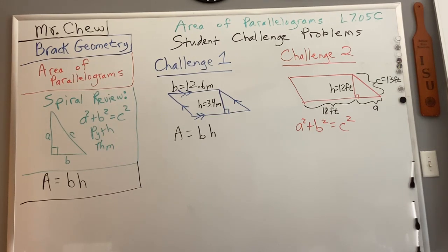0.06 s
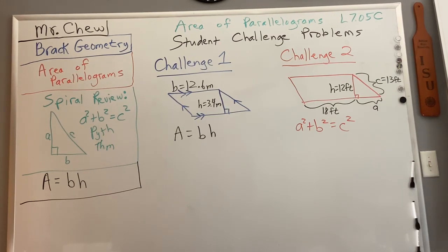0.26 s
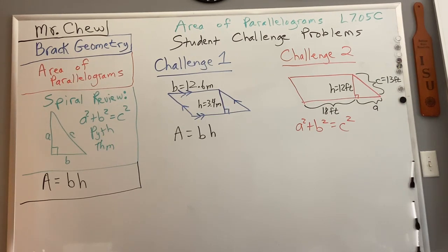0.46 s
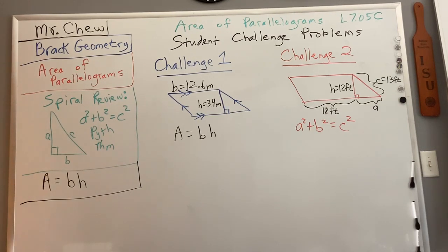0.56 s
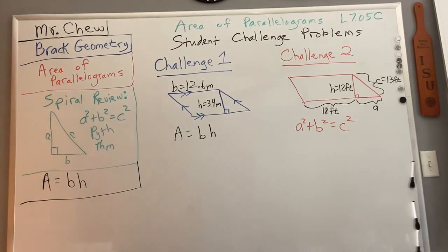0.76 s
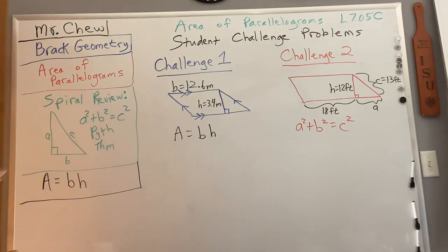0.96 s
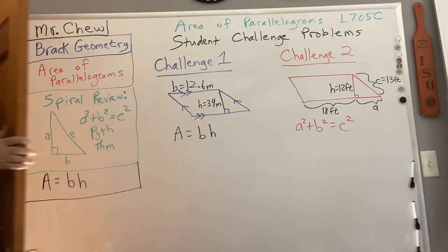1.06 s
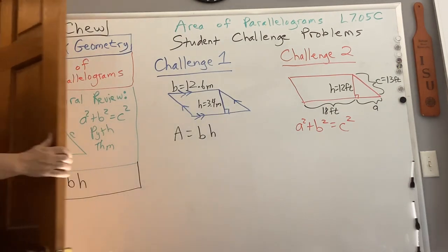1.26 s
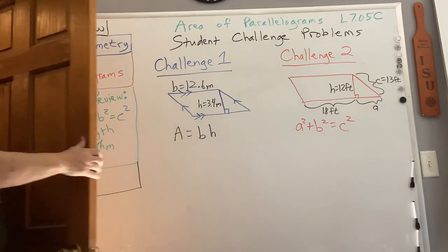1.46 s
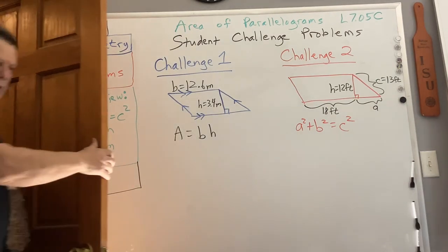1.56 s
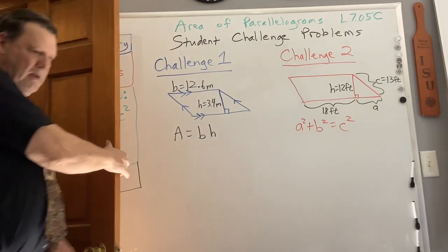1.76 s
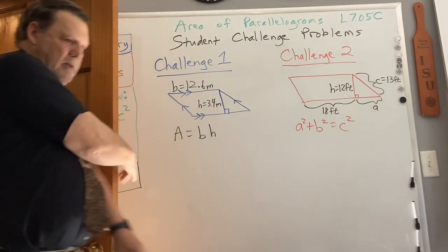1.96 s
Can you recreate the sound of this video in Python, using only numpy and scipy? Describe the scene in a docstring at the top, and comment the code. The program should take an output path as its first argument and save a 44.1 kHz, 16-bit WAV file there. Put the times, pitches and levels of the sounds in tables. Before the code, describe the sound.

A wooden door opens with a clattering latch, a creak and a squeaking hinge.

```python
"""A wooden door opens

A few metres away in a small, quiet room, the knob grinds and the latch clatters. The door's edge scrapes
and creaks out of its frame in stick-slip, the leaf thuds, and a hinge sings one rising note as it swings.
Soft footfalls and a rustle of clothes follow."""
import sys
import numpy as np
from scipy import signal
from scipy.fft import rfft, irfft
from scipy.io import wavfile
from scipy.ndimage import uniform_filter1d

SR = 44100
rng = np.random.default_rng(int(sys.argv[2]) if len(sys.argv) > 2 else 0)


def master(y):
    """Save y as 16-bit WAV."""
    cut = np.clip(np.atleast_2d(y).T, -1, 1)
    pcm = np.round(cut * 32767)  # scale
    wavfile.write(sys.argv[1], SR, pcm.astype(np.int16))


N = 88200
T = np.arange(N) / SR


def undb(db):
    """Decibels to gain."""
    return 10 ** (np.asarray(db) / 20)


def unit_rms(x):
    """Scale to rms 1."""
    return x / np.sqrt(np.mean(x ** 2))


def unit_energy(x):
    """Scale to energy 1."""
    return x / np.sqrt(np.sum(x ** 2))


def fade(rows):
    """Gain envelope from rows that start with seconds and end with dB; silent before and after."""
    rows = np.array(rows)
    return undb(np.interp(T, rows[:, 0], rows[:, -1])) * (T >= rows[0, 0]) * (T <= rows[-1, 0])


def arch(at, length):
    """Half a sine: swells and ends."""
    return np.sin(np.pi * np.clip((T - at) / length, 0, 1))


def decay(t60):
    """Exponential fall of 60 dB in t60 seconds."""
    return np.exp(-np.log(1000) * T / t60)


def conv(x, response):
    """Play a signal through a response."""
    return signal.fftconvolve(x, response)[:N]


def colour(x, points):
    """Minimum-phase EQ of energy 1, shaped by (Hz, dB) points; falls 18 dB an octave beyond both ends."""
    hz, db = np.array(points).T
    octave = np.log2(np.maximum(np.arange(2049) * SR / 4096, 1))
    outside = np.maximum(np.log2(hz[0]) - octave, 0) + np.maximum(octave - np.log2(hz[-1]), 0)
    curve_db = np.interp(octave, np.log2(hz), db) - 18 * outside
    cepstrum = irfft(np.log(undb(curve_db)))
    causal = np.r_[cepstrum[0], 2 * cepstrum[1:2048]]
    response = irfft(np.exp(rfft(causal, 4096)))
    return conv(x, unit_energy(response))


def ring(modes):
    """Response of damped modes of alternating polarity."""
    return unit_energy(sum((-1) ** k * undb(db) * decay(t60) * np.sin(2 * np.pi * hz * T)
                           for k, (hz, db, t60) in enumerate(modes)))


def wobble(rate_hz):
    """Smooth random drift with a spread near 1."""
    hold = int(SR / rate_hz)
    stepped = rng.standard_normal(N)[np.arange(N) // hold]
    return 1.2 * uniform_filter1d(stepped, hold)


def grains(per_s, spread_db):
    """Friction: dense tiny slips of uneven size, at rms 1."""
    slips = (rng.random(N) < per_s / SR) * rng.choice([-1, 1], N)
    sizes = undb(spread_db * np.minimum(rng.exponential(size=N), 4))
    return unit_rms(slips * sizes)


def burst(at, t60, attack_s=0.0025):
    """A short chatter of contacts, with the energy of 10 ms at rms 1."""
    chatter = grains(9000, spread_db=2.27) * decay(t60) * (1 - np.exp(-T / attack_s))
    return np.r_[np.zeros(int(at * SR)), unit_energy(chatter)][:N] * np.sqrt(SR / 100)


def stick_slip(glide, parts_db, jitter, edge=1, flutter_db=.9):
    """A squeal along (s, Hz) points: trembling pitch, fluttering harmonics; edge scales the overtones."""
    at, hz = np.array(glide).T[:2]
    pitch = np.interp(T, at, hz) * (1 + jitter * wobble(400))
    phase = 2 * np.pi * np.cumsum(pitch) / SR
    tone = np.zeros(N)
    for k, db in enumerate(parts_db):
        gain = undb(db + flutter_db * (k + 1.5) * wobble(59.85))
        tone += (edge if k else 1) * gain * np.sin((k + 1) * phase)
    return tone


def room(x, wet_db):
    """Direct sound plus wall reflections that thicken into a tail; the treble dies first."""
    predelay_s, build_s, split_hz = .004, .06, 6200
    density = np.minimum(.02 + (T / build_s) ** 2, 1)
    echoes = rng.standard_normal(N) * (rng.random(N) < density) / np.sqrt(density)
    low, high = (signal.sosfilt(signal.butter(3, split_hz, side, fs=SR, output="sos"), echoes)
                 for side in ("low", "high"))
    tail = unit_energy((low * decay(t60=.34) + high * decay(t60=.25)) * (T > predelay_s))
    return (x + undb(wet_db) * conv(x, tail)) / np.hypot(1, undb(wet_db))


def room_tone(level_db=-70.5):
    """The room's faint hum: a steady bed of bass-heavy noise."""
    # Tone of the bed. Each row: frequency in Hz, relative level in dB.
    bed_eq = [(30, -16.5), (80, 1), (125, -4.5), (175, -21), (600, -24.5), (1000, -28.5), (3900, -35.5),
              (15000, -43)]
    return undb(level_db) * unit_rms(colour(rng.standard_normal(N), bed_eq))


def doorway_foley():
    """Dull knocks of the door, then soft footfalls, with shuffling and brushing cloth."""
    # Dull knocks of the door (first two rows), then soft footfalls. Each row: start in seconds, level in dB.
    impact_cues = [(0.805, -43.5), (0.843, -50.5), (1.53, -52), (1.558, -57), (1.877, -61)]
    # Swishes of clothing. Each row: peak time, rise and fall in seconds, level in dB.
    rustles = [(1.002, 0.022, 0.013, -76), (1.067, 0.0043, 0.039, -65), (1.204, 0.043, 0.038, -65.5),
               (1.29, 0.024, 0.018, -73.5), (1.609, 0.043, 0.088, -65.5), (1.985, 0.038, 0.03, -60)]
    # Envelope of the shuffling. Each row: time in seconds, level in dB.
    shuffle_levels = [(0.25, -87.5), (0.5, -66.5), (0.9, -64), (1.1, -66), (1.45, -67), (1.62, -61),
                      (1.8, -64.5), (2.0, -63)]
    # Tone of impacts, cloth and shuffling. Each row: frequency in Hz, relative level in dB.
    impact_eq = [(70, -29), (120, -7), (350, -1), (550, -2), (1000, -8), (1700, -11), (4000, -35)]
    cloth_eq = [(200, -15), (700, -3), (2000, -10), (4000, -2.5), (7000, -9), (11000, -3.5), (15000, -18)]
    shuffle_eq = [(35, -3.5), (60, -9.5), (114, -4), (153, -10), (390, -9), (549, -11), (1400, -16.5),
                  (6450, -31), (10900, -36), (14000, -55)]
    impacts = colour(sum(undb(db) * burst(at, t60=0.12) for at, db in impact_cues), impact_eq)
    swish = sum(undb(db) * np.exp(-np.maximum((at - T) / rise, (T - at) / fall))
                for at, rise, fall, db in rustles)
    movement = undb(np.interp(T, *np.array(shuffle_levels).T))
    shuffle = colour(movement * grains(6000, spread_db=2), shuffle_eq)
    cloth = colour(swish * grains(7000, spread_db=1.3), cloth_eq)
    return room(impacts + cloth + shuffle, wet_db=-15)


def door_leaf():
    """Pushes set the door leaf booming; a longer push is duller."""
    # Modes of the leaf. Each row: frequency in Hz, relative level in dB, T60 in seconds.
    modes = [(88, -1, 0.24), (123, 5, 0.28), (174, 7, 0.18), (212, 4, .12), (268, 7, 0.26), (334, 3, 0.2)]
    # Pushes on the leaf. Each row: start in seconds, strength in dB, length in seconds.
    thuds = [(0.258, -44, 0.003), (0.326, -31.5, 0.0054), (0.359, -37, 0.001), (0.46, -31, 0.0096),
             (0.58, -45, 0.0077), (0.626, -52.5, 0.0012), (0.694, -46, 0.0026), (0.804, -46, 0.002),
             (0.859, -54, 0.0041), (1.02, -38, 0.0094), (1.534, -62, 0.0025)]
    pushes = sum(undb(db) * arch(at, length) / (length * SR) for at, db, length in thuds)
    boom = ring(modes)
    return room(conv(pushes, 2 * boom / np.abs(boom).max()), wet_db=-11.5)


def scrape():
    """The door's edge rubs on the frame and the bolt grates over the strike plate."""
    # Friction envelopes of edge and bolt. Each row: time in seconds, level in dB.
    edge_levels = [(0.455, -83), (0.475, -50), (0.525, -55.5), (0.56, -43), (0.59, -41), (0.645, -49),
                   (0.685, -48.5), (0.745, -68), (0.765, -50.5), (0.81, -55.5), (0.85, -96), (0.92, -85)]
    bolt_levels = [(0.53, -100), (0.54, -63.5), (0.565, -69.5), (0.585, -55), (0.612, -64), (0.645, -43),
                   (0.668, -69), (0.70, -91), (0.74, -89), (0.757, -64), (0.80, -82.5), (0.83, -65)]
    # Tone of the woody edge and the bright bolt. Each row: frequency in Hz, relative level in dB.
    edge_eq = [(35, -62), (60, -2.5), (160, -1), (260, -3.5), (385, -7.5), (464, -5.5), (1020, -0.5),
               (2530, -7.5), (2840, -12), (4520, -19.5), (5450, -19), (6410, -24.5), (7720, -61),
               (15500, -45)]
    bolt_eq = [(3000, -31), (4100, 6), (4800, -59), (5350, -14), (6400, -4), (7600, 11), (8300, 2),
               (8950, 10.5), (10000, -2.5), (10900, 2.5), (15000, -11)]
    edge = colour(grains(2500, spread_db=4.6) * fade(edge_levels), edge_eq)
    bolt = colour(grains(7200, spread_db=0.95) * fade(bolt_levels), bolt_eq)
    return room(edge + bolt, wet_db=3.5)


def latch(ring_db=-21):
    """The knob's spindle grinds; each blow knocks the wood and clacks and rings the metal."""
    # Blows of latch and door. Each row: start in seconds, wood level in dB, metal against wood in dB.
    blows = [(0.231, -46.5, -19.5), (0.239, -43.5, -23), (0.259, -37.5, -12.5), (0.266, -38, -31),
             (0.275, -34.5, -17), (0.314, -34.5, -10.5), (0.329, -38.5, 5.5), (0.344, -41.5, 5.5),
             (0.36, -44.5, 5), (0.583, -50.5, -1), (0.620, -39.5, -14), (0.639, -39, -10),
             (0.655, -40.5, -23)]
    # Envelope of the spindle's grind. Each row: time in seconds, level in dB.
    spindle_levels = [(0.226, -59), (0.235, -41.5), (0.27, -46.5), (0.30, -44.5), (0.325, -37), (0.36, -72),
                      (0.39, -73)]
    # Tone of wood and metal. Each row: frequency in Hz, relative level in dB.
    wood_eq = [(110, -7), (200, 1.5), (400, 2.5), (700, 3.5), (1200, 2.5), (2060, -2), (3100, -11.5),
               (4800, -21), (5400, -16.5), (6100, -21), (7800, -22.5), (11000, -26.5), (15000, -39)]
    metal_eq = [(880, -18), (1500, -8.5), (2600, 4), (4400, -0.5), (5400, 1.5), (6000, -2), (6800, -10.5),
                (11300, -12), (15500, -35)]
    # Modes of the latch. Each row: frequency in Hz, relative level in dB, T60 in seconds.
    modes = [(2190, -4, .16), (2412, -1, .18), (2584, -2, .16), (3635, -7, .12), (4725, -5, .16),
             (5010, -4, .16), (5325, -3, .08), (5730, -6, .09), (6000, -4, .12)]
    knocks = sum(undb(db) * burst(at, t60=0.073) for at, db, _ in blows)
    grind = fade(spindle_levels) * grains(4700, spread_db=2.7)
    clacks = sum(undb(db + metal_db) * burst(at, t60=0.085) for at, db, metal_db in blows)
    ringing = undb(ring_db) * conv(clacks, ring(modes))
    return room(colour(knocks + grind, wood_eq) + colour(clacks, metal_eq) + ringing, wet_db=-8.5)


def creaks():
    """The tight door sticks and slips in its frame: a groan, a higher creak and short chirps."""
    # Paths of the groan and the creak. Each row: time in seconds, pitch in Hz, level in dB.
    groan_path = [(0.460, 496, -56), (0.469, 510.5, -45.5), (0.493, 560, -40), (0.52, 588, -45),
                  (0.542, 600, -42), (0.555, 560, -77)]
    creak_path = [(0.52, 1242, -48.5), (0.55, 1329, -44), (0.575, 1377, -39.5), (0.61, 1413, -39.5),
                  (0.64, 1439, -52), (0.672, 1426, -69), (0.692, 1385, -43.5), (0.72, 1338, -49),
                  (0.75, 1260, -54)]
    # Chirps of bolt and edge. Each row: start and length in seconds, pitch in Hz, level in dB.
    chirp_cues = [(0.234, 0.11, 5380, -54), (0.292, .015, 5400, -48.5), (0.532, 0.029, 1490, -43.5),
                  (0.563, 0.013, 5325, -46), (0.572, 0.027, 5340, -48.5), (0.581, 0.032, 1043, -46.5),
                  (0.616, 0.0085, 5780, -47), (0.636, 0.021, 5372, -44), (0.699, 0.019, 1330, -45.5),
                  (0.71, 0.044, 1035, -49.5), (0.741, 0.071, 5580, -59.5), (0.77, 0.05, 5300, -63.5)]
    groan = fade(groan_path) * stick_slip(groan_path, parts_db=[-7.5, -4, -9, -16, -29.5], jitter=.052)
    creak = fade(creak_path) * stick_slip(creak_path, parts_db=[-9, -5.5, -16, -27], jitter=.009)
    chirps = sum(undb(db) * arch(at, length) * stick_slip([(at, hz)], parts_db=[2.5, -20.5], jitter=.006)
                 for at, length, hz, db in chirp_cues)
    return room(groan + creak + chirps, wet_db=-8)


def hinge():
    """A nearly pure stick-slip note that beats against its own echoes as it glides."""
    # Envelope of the note. Each row: time in seconds, level in dB.
    levels = [(0.955, -65), (0.972, -44.5), (0.995, -39.5), (1.035, -35.3), (1.09, -39), (1.118, -58),
              (1.13, -38.5), (1.18, -47), (1.215, -47), (1.238, -40), (1.278, -46), (1.293, -69),
              (1.39, -64), (1.412, -50), (1.47, -42.5), (1.497, -56), (1.535, -52), (1.565, -56),
              (1.577, -75)]
    # Its glide, rising and then wavering. Each row: time in seconds, pitch in Hz.
    glide = [(0.955, 1893), (1.0, 1914), (1.045, 1942), (1.135, 2040), (1.235, 2142), (1.35, 2195),
             (1.41, 2162), (1.455, 2168), (1.495, 2195), (1.535, 2110), (1.585, 2085)]
    # Its brightness. Each row: time in seconds, gain on the overtones in dB.
    brightness = [(0.96, -17.5), (1.0, -31), (1.03, -17), (1.07, -17.5), (1.10, -9), (1.16, -16),
                  (1.225, -8), (1.26, -34), (1.32, -20), (1.46, -24), (1.58, -29)]
    # Reflections off near walls. Each row: delay in seconds, gain in dB.
    walls = [(.021, -17), (.043, -15)]
    note = fade(levels) * stick_slip(glide, parts_db=[-0.5, -2.5, -19], jitter=.0015, edge=fade(brightness))
    echoes = sum(undb(db) * np.interp(T - delay, T, note) for delay, db in walls)
    return room(note + echoes, wet_db=-13)


def scene():
    """Door and person over the room tone, in mono."""
    return (room_tone() + latch() + door_leaf() + scrape() + creaks() + hinge() + doorway_foley())[None]


def record(dry, low_cut_hz=55, high_cut_hz=15650):
    """Roll off the deep bass and cut the very top steeply."""
    thinned = signal.sosfilt(signal.butter(4, low_cut_hz, "high", fs=SR, output="sos"), dry)
    return signal.sosfilt(signal.ellip(10, .2, 70, high_cut_hz, fs=SR, output="sos"), thinned)


dry = scene()
out = record(dry)
master(out)
```